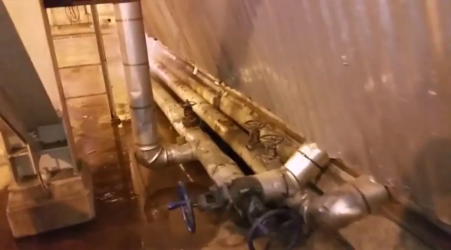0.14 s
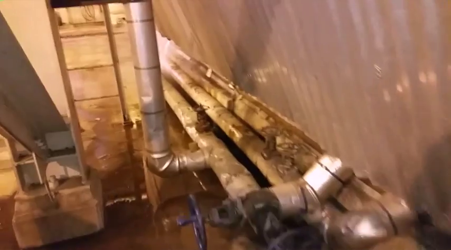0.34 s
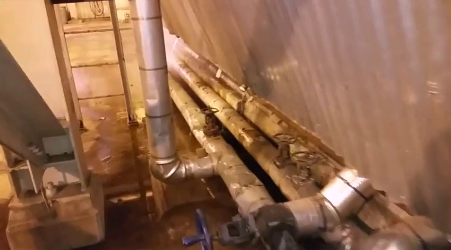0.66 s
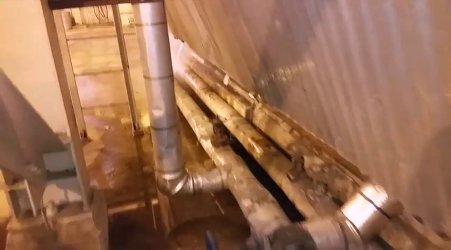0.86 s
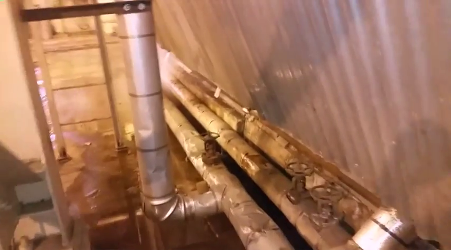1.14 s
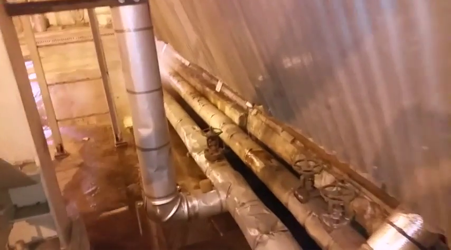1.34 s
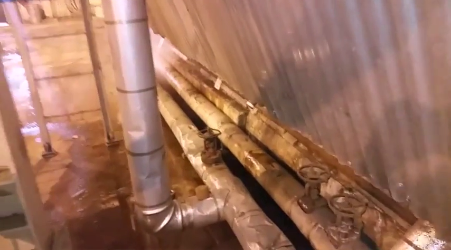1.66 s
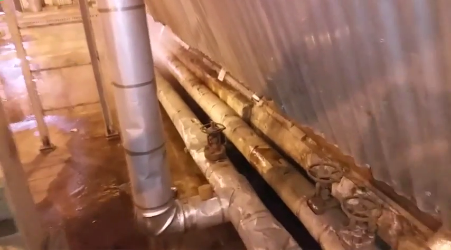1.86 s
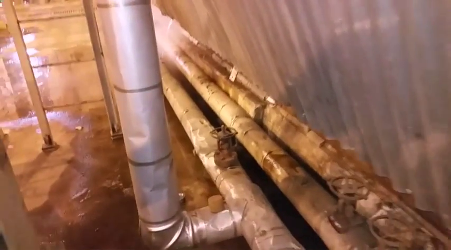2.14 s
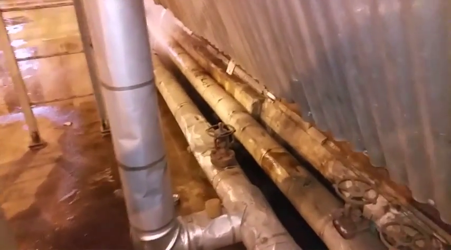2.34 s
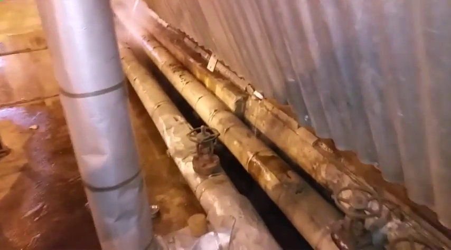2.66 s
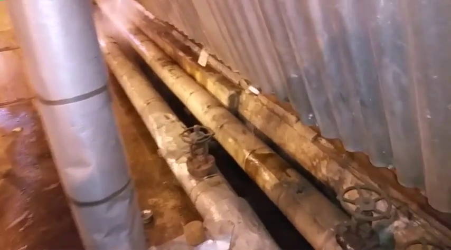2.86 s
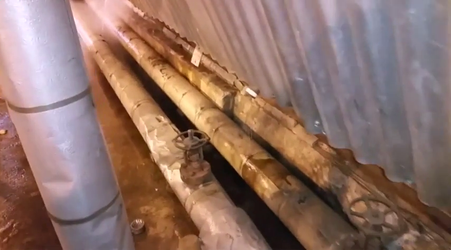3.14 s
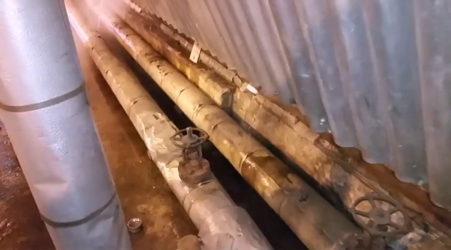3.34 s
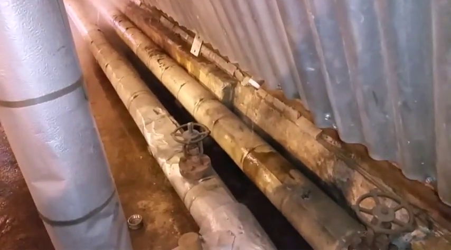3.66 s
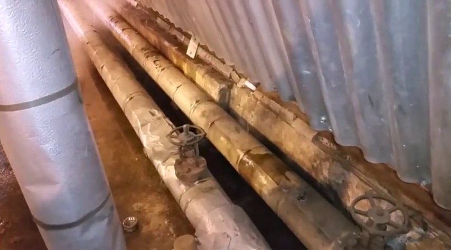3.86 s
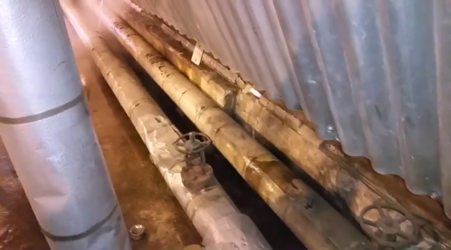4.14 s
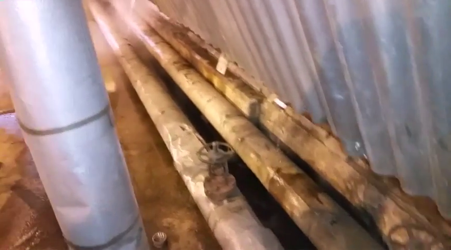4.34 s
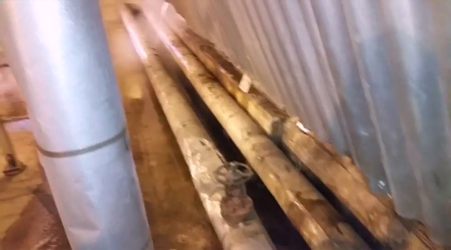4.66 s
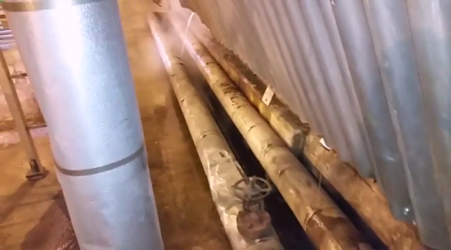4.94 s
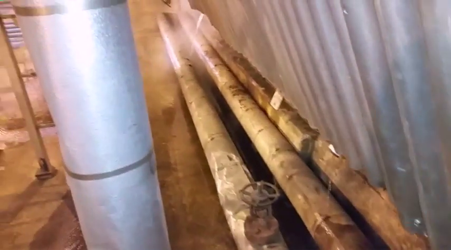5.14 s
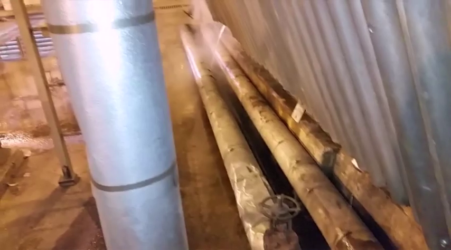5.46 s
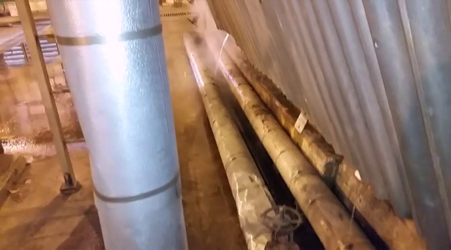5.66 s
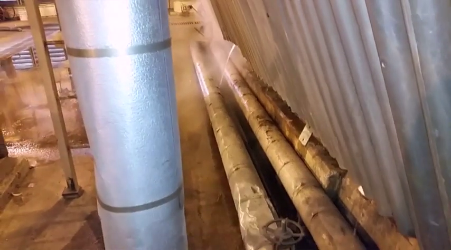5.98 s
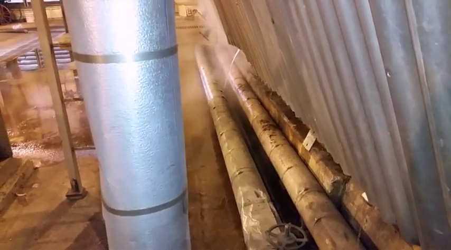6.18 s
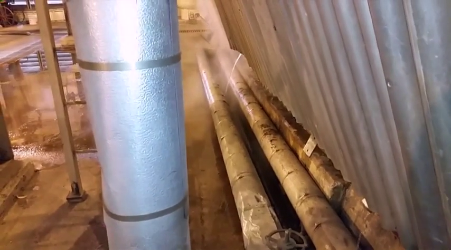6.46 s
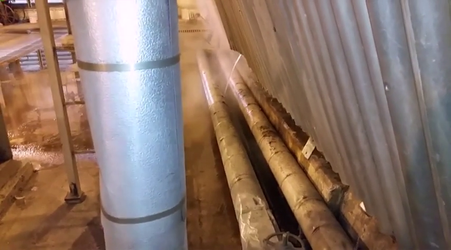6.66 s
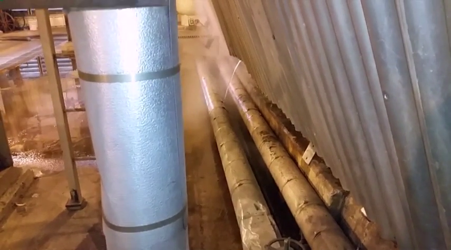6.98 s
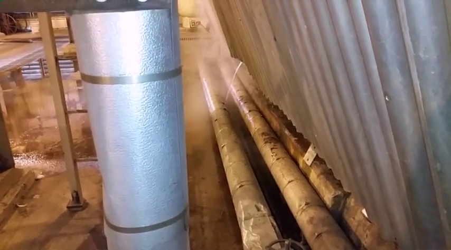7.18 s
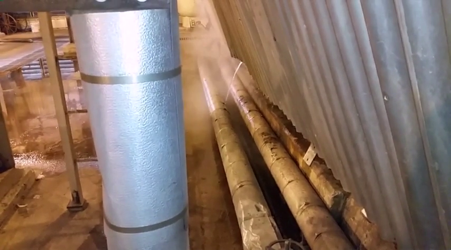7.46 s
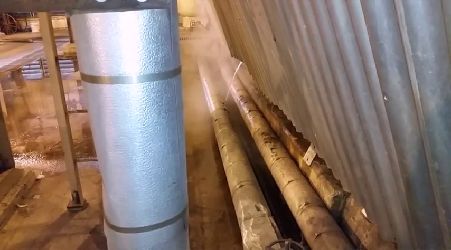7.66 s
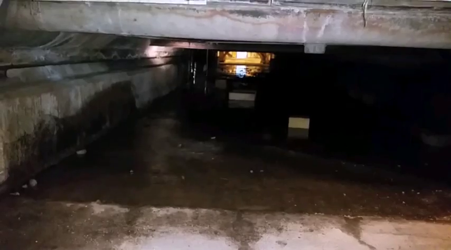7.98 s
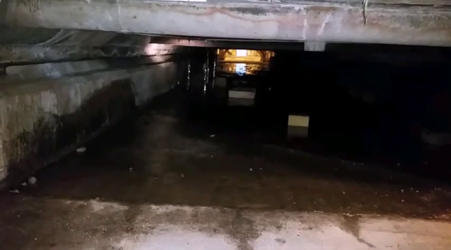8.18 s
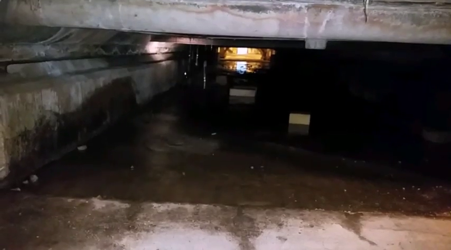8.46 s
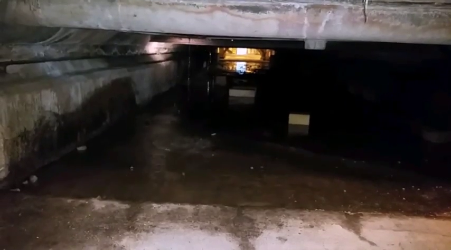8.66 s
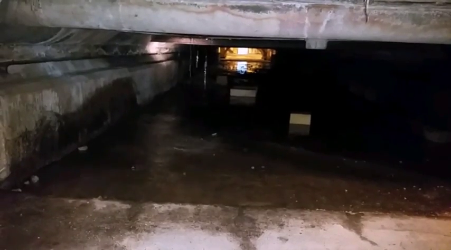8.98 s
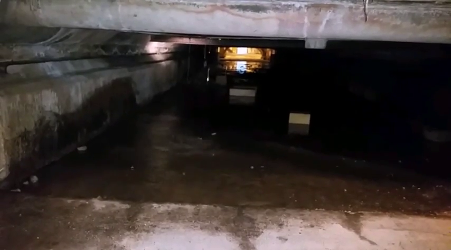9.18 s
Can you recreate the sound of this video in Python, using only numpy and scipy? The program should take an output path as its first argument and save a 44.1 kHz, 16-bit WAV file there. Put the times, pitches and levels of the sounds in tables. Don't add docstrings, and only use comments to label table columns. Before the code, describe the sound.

Dense industrial plant drone of rumbling furnace, pumps, fan and hissing steam cuts dead, then returns duller with a whistling leak rising at the end.

```python
import sys
import numpy as np
from scipy import signal
from scipy.io import wavfile
from scipy.ndimage import uniform_filter1d

SR = 44100
rng = np.random.default_rng(int(sys.argv[2]) if len(sys.argv) > 2 else 0)


def gain_from_db(level_db):
    decades = np.asarray(level_db, float) / 20
    return 10 ** decades


def to_wav(sig):
    pcm = np.clip(np.atleast_2d(sig), -1, 1) * 32767
    pcm = np.round(pcm).astype(np.int16)
    wavfile.write(sys.argv[1], SR, pcm.T)


N = 411012

PIPES_END_S, TRENCH_START_S = 7.8515, 8.228

# freq_hz, level_db
RIGHT_PORT = [(45, -0.5), (200, 0.9), (450, -3), (1000, -5), (2200, -9), (4000, -13), (5500, -22),
              (7000, -25.5), (9000, -14), (10500, -0.5), (12500, 7.5), (14500, 6.5), (15600, 10)]
# freq_hz, coherence (-1 to 1)
PORT_COHERENCE = [(25, 0.56), (60, 0.99), (215, .94), (390, 0.62), (650, 0.57), (1000, 0.23), (1400, -0.43),
                  (1900, -0.17), (2300, 0.076)]


def evened(x):
    return x / np.sqrt(np.mean(x ** 2) + 1e-20)


def read(points, hz):
    f, value = np.transpose(points)
    return np.interp(np.log(hz + 1), np.log(f + 1), value)


def coherence(hz):
    return np.clip(read(PORT_COHERENCE, hz), -1, 1)


def wander(t, top_hz):
    drift = 0
    for f in np.geomspace(.2, top_hz, num=16):
        drift = drift + np.sin(2 * np.pi * (f * t + rng.random())) / np.sqrt(f)
    return evened(drift)


def swells(rows, t):
    return sum(db * np.exp(-((t - s) / width) ** 2) for s, width, db in rows)


def walk_db(t, far_db, near_db):
    return far_db + (near_db - far_db) * np.clip(t / 3.6, 0, 1)


def smooth_field(shape, bins, frames):
    field = rng.standard_normal(shape)
    field = uniform_filter1d(field, size=bins, axis=0)
    return evened(uniform_filter1d(field, size=frames, axis=1))


def roar_and_hiss():
    # freq_hz, level_db_per_hz
    by_pipes = [(45, -41), (100, -35), (160, -39), (230, -43), (450, -48.5), (1000, -46.5), (1900, -45),
                (2850, -51), (3400, -52), (4700, -56.5), (5300, -55.5), (9000, -61), (14000, -68.5),
                (15700, -82)]
    # freq_hz, level_db_per_hz
    by_trench = [(45, -41), (100, -31), (160, -43), (230, -49.5), (450, -51), (1000, -51.5), (1900, -51.5),
                 (2800, -57), (3400, -58.5), (4700, -57), (5200, -59.5), (9000, -62.5), (14000, -62),
                 (15700, -76.5)]
    # time_s, level_db
    swell_points = [(0, -0.5), (.35, 1.1), (.65, 0), (1.8, -0.5), (2.3, -1.5), (2.9, -1), (3.3, 0),
                    (4.4, -.5), (5.5, -0.1), (6.1, -0.1), (6.35, -1.5), (6.8, 0), (7.85, -0.6), (8.5, -0.8),
                    (8.9, -0.7), (9.32, 1)]
    # freq_hz, width_hz, level_db
    pipe_ring = [(374, 48, 3.5), (1850, 180, 0.5), (2070, 120, 0), (3500, 160, 2.5), (4030, 150, 2.5),
                 (4950, 91, 3.5), (5290, 190, 3), (2930, 98, -3.5), (2626, 110.5, -3.5), (1600, 170, -1.5)]

    hz = np.fft.rfftfreq(2048, 1 / SR)
    f = hz[:, None]
    t = np.arange(N // 256 + 5) * 256 / SR
    shape = (len(hz), len(t))
    in_trench = t > (PIPES_END_S + TRENCH_START_S) / 2
    level_db = np.where(in_trench, read(by_trench, f), read(by_pipes, f))

    swell_db = np.interp(t, *np.transpose(swell_points))
    draught_db = .8 * swell_db
    flicker = np.interp(t, t[::8], rng.standard_normal(len(t[::8])))
    steam_db = swell_db + 0.42 * wander(t, 14.) + 0.51 * flicker
    steam_share = np.clip((f - 2200) / 1200, 0, 1)
    level_db = level_db + (1 - steam_share) * draught_db + steam_share * steam_db

    level_db += .8 * smooth_field(shape, 20, 12)
    level_db += 1.1 * smooth_field(shape, 3, 250)
    level_db -= 40 * np.log10(np.maximum(44 / (f + 1), 1))
    for ring_hz, width_hz, ring_db in pipe_ring:
        level_db += ring_db / (1 + (2 * (f - ring_hz) / width_hz) ** 2)

    left = rng.standard_normal(shape) + 1j * rng.standard_normal(shape)
    other = rng.standard_normal(shape) + 1j * rng.standard_normal(shape)
    same = coherence(f)
    right = same * left + np.sqrt(1 - same ** 2) * other
    right *= gain_from_db(read(RIGHT_PORT, f))
    spectra = np.array([left, right]) * gain_from_db(level_db)
    return gain_from_db(14.5) * signal.istft(spectra, nperseg=2048, noverlap=1792)[1][:, :N]


def tones(lines, level_db, waver_hz, flutter_db):
    t, out = np.arange(N) / SR, np.zeros((2, N))
    slow = t[::441]
    level_db, waver_hz, flutter_db = (
        np.broadcast_to(v, N)[::441] for v in (level_db, waver_hz, flutter_db))
    for hz, db in lines:
        pitch_hz = np.interp(t, slow, hz + waver_hz * wander(slow, 6.))
        size_db = db + level_db + flutter_db * wander(slow, 4.)
        size = np.sqrt(2) * np.interp(t, slow, gain_from_db(size_db))
        phase = 2 * np.pi * (np.cumsum(pitch_hz) / SR + rng.random())
        out[0] += size * np.sin(phase)
        out[1] += size * gain_from_db(read(RIGHT_PORT, hz)) * np.sin(phase - np.arccos(coherence(hz)))
    return out


def furnace(t):
    # freq_hz, level_db
    furnace_notes = [(66, -1), (44.3, -16.5), (19.6, -24), (80.5, -10), (111.8, -5), (98.7, -11)]
    # time_s, width_s, rise_db
    flame_surges = [(.2, 0.22, 8.1), (.7, .1, 6.3), (1.25, 0.23, 14), (1.9, 0.4, 14.4), (2.7, 0.32, 9.7),
                    (3.4, .25, 7.6), (3.95, 0.19, 11), (4.9, 0.4, 14), (5.4, 0.11, 11), (6.4, 0.31, 16),
                    (7.0, .12, 7.7), (7.6, 0.39, 12.7), (8.55, 0.23, 16.4), (9.25, 0.18, 9.1)]
    main = tones(furnace_notes[:1], -31.5 + swells(flame_surges, t), waver_hz=0.61, flutter_db=.5)
    return main + tones(furnace_notes[1:], walk_db(t, -21, -25.5), waver_hz=2.2, flutter_db=3.7)


def mains_hum(t):
    mains_hz = 60.03
    # multiple, level_db
    mains_harmonics = [(2, 0), (4, -18), (8, -21)]
    level_db = np.where(t > PIPES_END_S, -18.5, walk_db(t, -26, -23))
    return tones([(k * mains_hz, db) for k, db in mains_harmonics], level_db, 0.11, 1.1)


def vane_pump(t):
    shaft_hz = 29.76
    # multiple, level_db
    pump_harmonics = [(7, 0), (10, -19), (12, -12), (14, -17), (15, -15), (21, -19)]
    # time_s, width_s, level_db
    pump_spots = [
        (.15, 0.23, -5.5),
        (1.1, 0.18, 2.5),
        (1.75, 0.27, -12),
        (4.2, 0.37, -5.5),
        (5.9, 0.27, 2.5),
        (6.55, 0.094, -6.5),
    ]
    level_db = np.where(t > PIPES_END_S, -36, walk_db(t, -26.5, -24.5)) + swells(pump_spots, t)
    return tones([(k * shaft_hz, db) for k, db in pump_harmonics], level_db, 0.27, 1.1)


def gear_whine(t):
    # freq_hz, level_db
    gear_mesh = [(2789.3, 0)]
    # time_s, width_s, rise_db
    whine_crests = [(.15, .3, 4.4), (1.2, .5, 4.9), (2.2, 0.24, 5), (2.8, .15, 4), (3.4, .3, 2.7),
                    (4.32, .22, 8.3), (6.42, 0.16, 8.6), (6.95, 0.16, 6), (7.2, 0.17, 8), (7.5, 0.22, 5)]
    in_trench = t > PIPES_END_S
    trench_db = -35.5 - 0.7 + 2.5 * (t - TRENCH_START_S)
    level_db = np.where(in_trench, trench_db, -39 + swells(whine_crests, t))
    return tones(gear_mesh, level_db, np.where(in_trench, .4, 1.3), np.where(in_trench, .3, 1.6))


def fan_and_bearings(t):
    fan_hz = 29.28
    # multiple, level_db
    fan_orders = [(1, -39), (2.035, -28.5), (5, -32), (6.42, -37), (9, -43), (10, -44), (11, -45),
                  (20, -48)]
    # freq_hz, level_db
    bearing_notes = [(1344, -42), (2025, -44), (2387, -48), (2503, -45)]
    shade_db = np.where(t > PIPES_END_S, -8, 0)
    fan = tones([(k * fan_hz, db) for k, db in fan_orders], shade_db, waver_hz=.5, flutter_db=3.6)
    return fan + tones(bearing_notes, shade_db, waver_hz=2.5, flutter_db=2.5)


def steam_leak(t):
    # time_s, pitch_hz, level_db
    leak_path = [
        (0, 5066, -46),
        (7.85, 5066, -46),
        (8.3, 5090, -45),
        (8.8, 5120, -41),
        (9.1, 5110, -35),
        (9.2, 5060, -35),
        (9.32, 5040, -34),
    ]
    s, pitch_hz, level_db = np.transpose(leak_path)
    pole = np.exp(-np.pi * 40 / SR)
    jet = rng.standard_normal(N) + 1j * rng.standard_normal(N)
    breath = signal.lfilter([1 - pole], [1, -pole], jet)
    carrier = np.exp(2j * np.pi * np.cumsum(np.interp(t, s, pitch_hz)) / SR)
    whistle = evened((breath * carrier).real)
    port_gain = gain_from_db([[0], [read(RIGHT_PORT, pitch_hz[0])]])
    return gain_from_db(np.interp(t, s, level_db)) * whistle * port_gain


def drop_weak_bands(x):
    # freq_hz, level_db_per_hz
    mute_floor = [(3000, -80), (4500, -76), (7000, -73.5), (9300, -73), (12000, -72.5), (14000, -73),
                  (15150, -73), (15260, -50)]
    window = np.sqrt(signal.windows.hann(2048, sym=False))
    hz, t, z = signal.stft(x, SR, window, nperseg=2048, noverlap=1024, scaling="psd")
    band_hz = hz[4:1024:8]
    power = abs(z[:, :1024].reshape(2, 128, 8, -1)) ** 2
    band_db = 10 * np.log10(2 * power.mean(2) + 1e-20)

    spare = evened(uniform_filter1d(rng.standard_normal((len(t), 2)), size=3, axis=0)).T
    ease_db = np.array([[-9], [-16]]) * np.clip(spare + [[.25], [0]], 0, .8)
    kept = band_db > read(mute_floor, band_hz)[:, None] + ease_db[:, None]

    rich = rng.random(len(t)) < np.where(t > PIPES_END_S, .7, .12)
    kept[1] |= rich & (band_hz > 15100)[:, None]
    z[:, :1024] *= np.repeat(kept, 8, axis=1)
    return signal.istft(z, SR, window, nperseg=2048, noverlap=1024, scaling="psd")[1][:, :N]


def scene():
    t = np.arange(N) / SR
    machines = furnace(t) + mains_hum(t) + vane_pump(t) + gear_whine(t) + fan_and_bearings(t)
    return roar_and_hiss() + machines + steam_leak(t)


def band_limit(x):
    return signal.sosfilt(signal.butter(12, 15800, fs=SR, output="sos"), x)


def record(dry):
    t = np.arange(N) / SR
    ceiling = 1.25
    heard = drop_weak_bands(ceiling * np.tanh(dry / ceiling))
    gain = np.where(t < PIPES_END_S, 1, np.clip((t - TRENCH_START_S) / .33, 0, 1))
    return band_limit(heard * gain)


dry = scene()
out = record(dry)
to_wav(out)
```